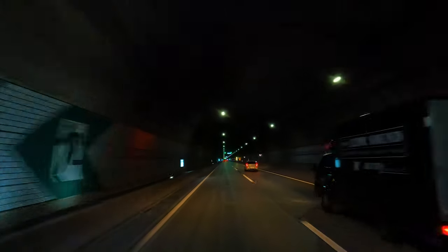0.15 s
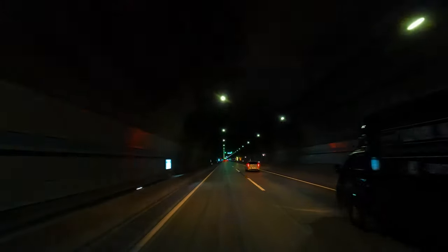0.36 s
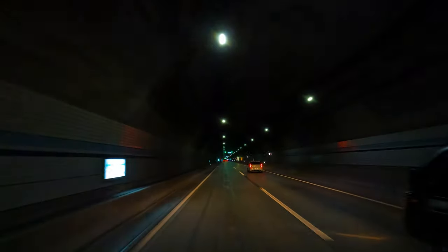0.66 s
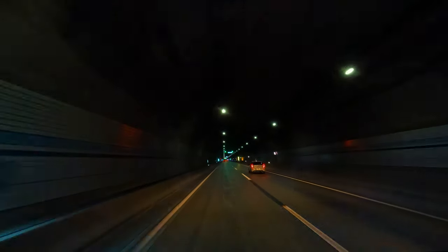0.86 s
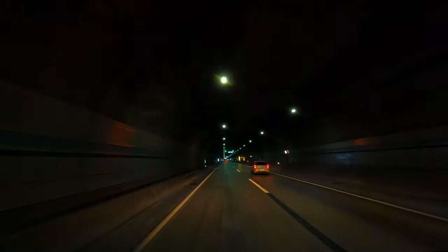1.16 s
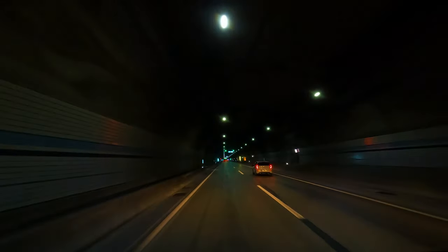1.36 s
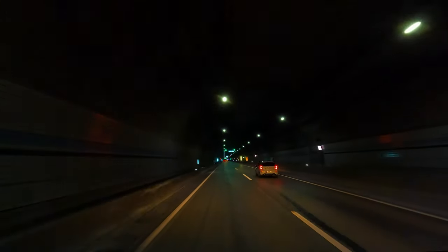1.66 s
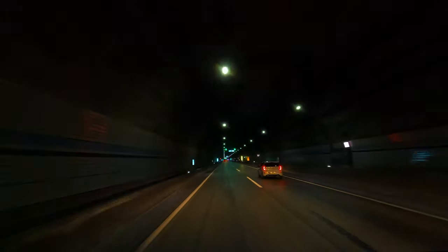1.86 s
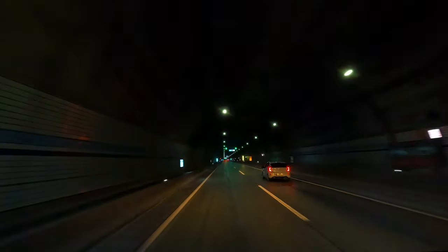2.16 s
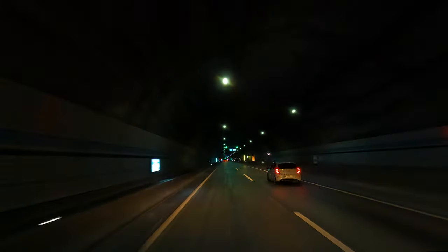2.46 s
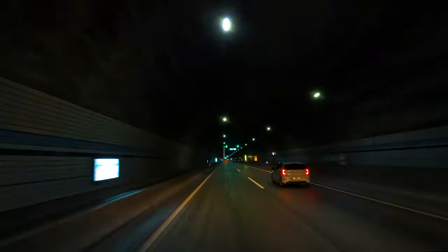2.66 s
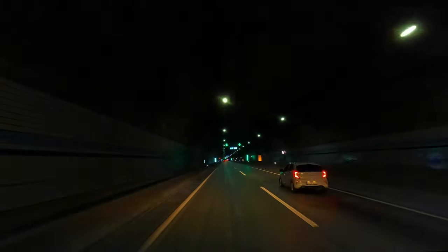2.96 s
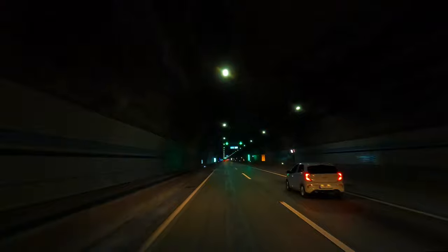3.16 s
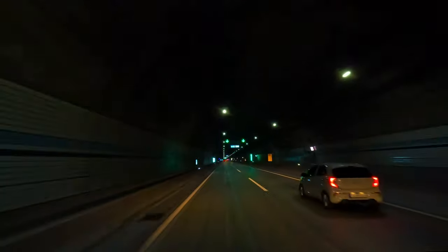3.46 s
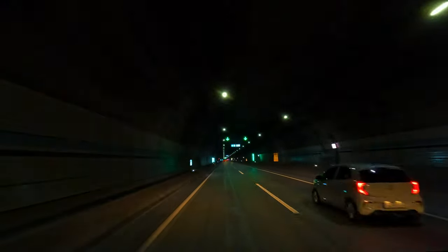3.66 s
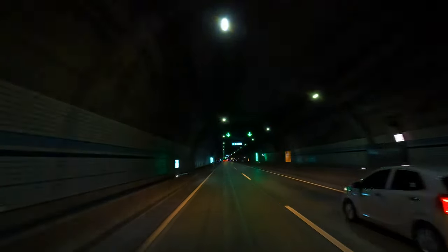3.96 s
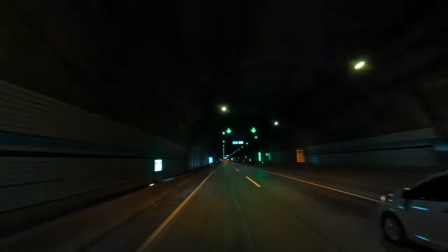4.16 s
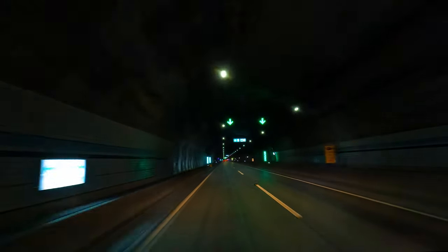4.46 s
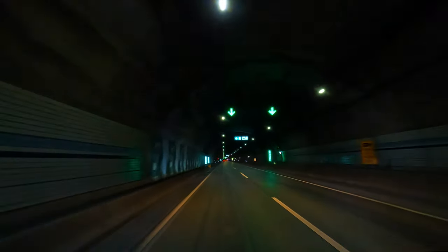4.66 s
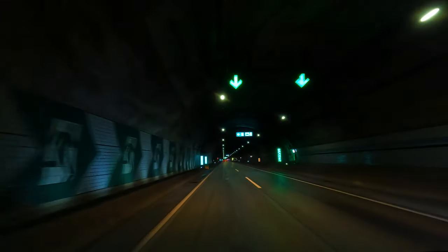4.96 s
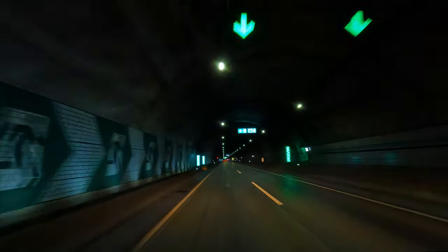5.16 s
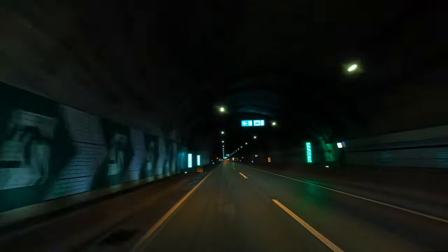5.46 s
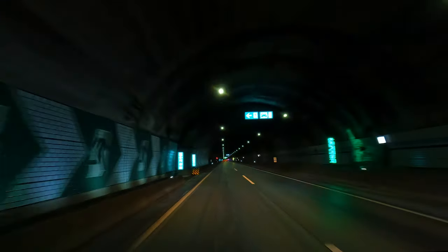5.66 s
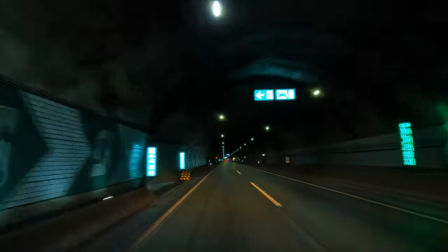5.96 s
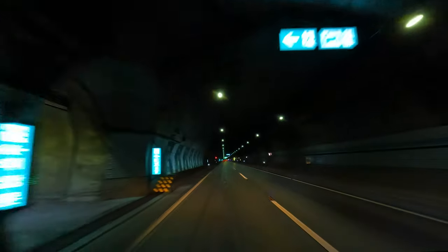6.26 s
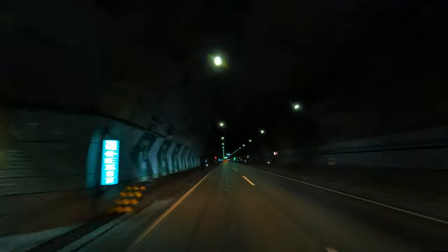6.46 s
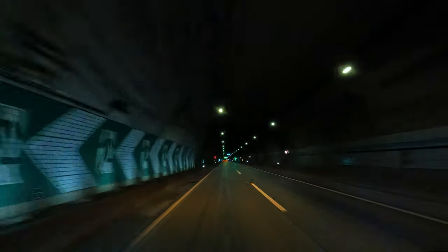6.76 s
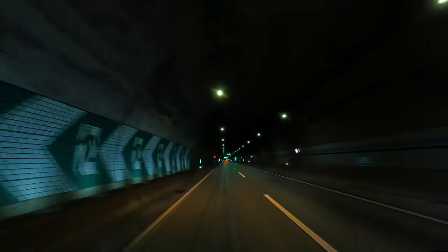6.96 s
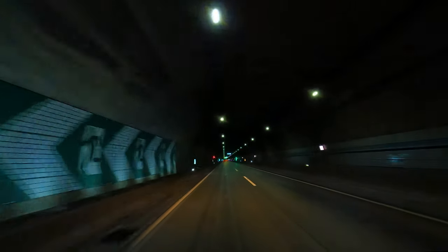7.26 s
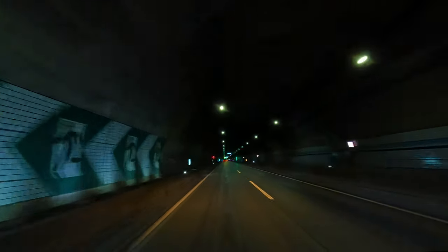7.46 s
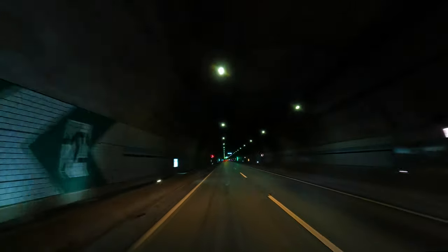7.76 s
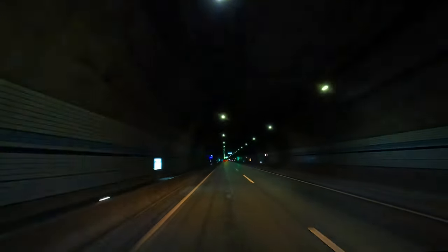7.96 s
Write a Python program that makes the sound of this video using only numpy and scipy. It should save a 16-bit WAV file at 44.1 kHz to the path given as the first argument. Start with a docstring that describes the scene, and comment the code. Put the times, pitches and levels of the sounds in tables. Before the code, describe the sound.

Constant low road rumble fills the closed cabin of a car moving at speed through a tunnel. Tyre roar and light wind hiss gently swell and ebb over it, dulled by the windows and coloured by the tunnel walls. Brief low throbs, a few hollow surges and a faint wavering whine pass through the noise, with two barely audible ticks. The microphone is inside the car.

```python
"""Road rumble fills a car cruising through a long tunnel, heard from behind the windscreen.
The uneven surface forces body, cabin air, tyres and floor to vibrate. Treads roar and air hisses along
the glass; cabin and tunnel walls reflect both, and narrow resonances colour them. Low throbs and hollow
swells pass, air in the tread grooves rings as a thin whine, and two faint, dull ticks sound."""
import sys
import numpy as np
from scipy import signal
from scipy.fft import rfft, irfft
from scipy.io import wavfile
from scipy.ndimage import uniform_filter1d

SR = 44100
rng = np.random.default_rng(int(sys.argv[2]) if len(sys.argv) > 2 else 0)


def put_to_file(sound):
    """Save the sound as 16-bit audio at rate SR, in the file named by the first command-line argument."""
    columns = np.atleast_2d(sound).T  # one column per channel
    safe = np.clip(columns, -1, 1)
    whole_steps = np.round(safe * 32767)
    wavfile.write(sys.argv[1], SR, whole_steps.astype(np.int16))


N = 358091
TIME = np.arange(N) / SR
BINS = np.maximum(np.arange(N // 2 + 1) * SR / N, 1)  # Hz

# spectrum of the road noise in the closed car: (frequency [Hz], relative level [dB])
RUMBLE_SPECTRUM = [(5, -9), (15, -1), (27, 2), (57, -0.4), (71, 1.5), (83, -2), (105, -0.5), (138, -1),
                   (155, -5), (215, -5.5), (250, -8), (300, -6.5), (345, -8.5), (385, -10), (600, -13.5)]
# brief surges and dips in the rumble:
# (centre time [s], duration [s], boom lift [dB], drone lift [dB], growl lift [dB])
SURGES = [(0.077, 0.24, -4, -2.5, 0.5), (0.204, 0.11, -4, 5, 2.5), (.55, 0.6, -0.5, -1.5, -0.5),
          (1.172, 0.24, -1.5, 0.7, -0.6), (1.456, 0.18, -4.5, -3, 1), (1.852, 0.13, 2.5, 0.5, 0),
          (2.4, .35, -1.5, 0, 0.5), (2.697, 0.23, 0.5, 0.3, -0.5), (3.38, 0.7, -0.1, 1.3, 2),
          (4.426, 0.12, -1.5, 4, -1), (4.7, 0.25, 0, -1, -1.5), (5.002, 0.17, 0, 3.5, 0),
          (5.347, 0.19, 0.5, 3.5, -2), (6.402, 0.31, -2, -1.5, 0.5), (6.656, 0.13, -1, 4.5, 1.5),
          (7.066, 0.11, -1.5, 0, 3), (7.352, 0.19, 0, -3, -1), (7.852, 0.26, -3.5, 2.4, -0.8)]
# swell and ebb of the outside rush: (time [s], relative roar level [dB], relative hiss level [dB])
RUSH_LEVELS = [(0.0, -44, -49), (0.27, -45.5, -50.5), (0.46, -41, -48), (0.58, -42.5, -48),
               (0.73, -44.5, -49.5), (0.95, -43.5, -48), (1.15, -42, -48.5), (1.3, -44, -48.5),
               (1.55, -41.5, -48.5), (1.95, -41, -48.5), (2.25, -42, -49), (2.55, -44.5, -49.5),
               (2.9, -41, -48), (3.1, -41.7, -48.5), (3.55, -41.5, -50), (3.8, -42.3, -49.5),
               (4.15, -43, -50.5), (4.4, -41.5, -49.5), (4.76, -40.5, -48), (4.95, -41.5, -48.5),
               (5.3, -42.5, -49.5), (5.55, -43.5, -50.5), (5.8, -40.5, -49.5), (6.05, -42.5, -50),
               (6.3, -40.5, -48.5), (6.75, -40.5, -49), (7.08, -43.5, -50.9), (7.42, -40.3, -48.5),
               (7.7, -43.5, -50.2), (8.1, -40.5, -48.5)]
# transmission through glass and seals: (frequency [Hz], relative gain [dB])
TRANSMISSION = [(620, 0.5), (850, -0.9), (1130, -3.5), (1400, -9.5), (1800, -16.5), (2300, -20),
                (3000, -22.5), (4000, -29), (5500, -36), (8000, -44.5), (10000, -55.5), (11500, -59.5),
                (12700, -65)]
# narrow modes of panes, trim and cabin air: (frequency [Hz], bandwidth [Hz], lift [dB])
MODES = [(640, 14, 2), (820, 26, 2.5), (878, 22, 2.2), (1022, 10, 2), (1090, 9, 3), (1106, 9, 2),
         (1150, 16, 2), (1230, 9, 4), (1535, 12, 3.5), (1598, 14, 3.5), (1635, 20, 6), (1832, 16, 6),
         (1860, 14, 4.5), (1916, 10, 3.5), (1986, 13, 7.5), (2131, 13, 6), (2205, 16, 4.5), (2346, 14, 4.5),
         (2672, 14, 3.5), (2713, 22, 4), (2901, 16, 4), (3165, 10, 4), (3196, 19, 6), (3493, 17, 3),
         (3578, 14, 8), (3816, 20, 5), (3967, 14, 9), (5345, 16, 5), (5916, 16, 5.5), (5986, 20, 5.5),
         (6395, 31, 4)]
# passing throbs and hollow roars:
# (centre time [s], duration [s], frequency [Hz], bandwidth [Hz], level at the centre [dB])
SWELLS = [(0.158, 0.23, 123, 50, -35.5), (0.8, 1, 112, 65, -38), (1.133, 0.3, 300, 109, -42),
          (1.9, 1, 804, 250, -48), (2.697, 0.93, 288, 80, -43.5), (3.08, 0.23, 104, 35, -39),
          (3.2, 0.19, 528, 55.3, -47), (4.898, 0.24, 77, 22, -38.5), (5.72, 0.31, 74.5, 30, -40.5),
          (6.48, 0.64, 795, 200, -48), (7.143, 0.36, 120, 55.7, -38), (7.618, 0.21, 118, 55, -38),
          (8.022, 0.062, 76, 22, -40)]
# strength of the groove whine: (time [s], level [dB])
WHINE_LEVELS = [(0, -53.5), (0.6, -55.5), (0.75, -57.5), (1.3, -59), (1.9, -58), (2.5, -59), (3.0, -52.5),
                (3.65, -55.5), (3.9, -69), (4.55, -61), (4.75, -53), (5.35, -53), (5.55, -58), (5.8, -55.5),
                (6.7, -53.5), (7.3, -50.5), (8.1, -59.5)]
# faint, dull ticks in the road noise: (time [s], gain [dB], centre frequency [Hz], decay time [s])
TICKS = [(3.794, -28.5, 523, 0.0074), (7.322, -30.5, 1020, 0.0045)]
# stereo width at the seat: (frequency [Hz], side relative to mid [dB])
STEREO_WIDTH = [(120, -82.5), (170, -67), (240, -61), (320, -50.5), (420, -20.5), (600, -18.5), (940, -16),
                (2400, -14.5), (5000, -15), (8000, -19.5)]

SHAKE_DB, BOOM_DB, DRONE_DB, GROWL_DB = -38.5, -34.5, -38, -40  # rms before surges, grain and lumps
LUMP_SPREAD_DB, LUMP_RATE_HZ = 0.86, 13
WHINE_HZ, WHINE_WIDTH_HZ = 1061, 11
TOP_HZ = 12700


def road_rumble():
    """Forced vibration: the road shakes the sprung body, pumps the cabin air, drums tyres and floor."""
    boom_lift_db, drone_lift_db, growl_lift_db = surge_lift()
    body = vibration(band(5, 60), hold_s=0.036, grain_db=1.0, rate_hz=4)
    cabin_air = vibration(band(58.7, 146.6), hold_s=0.046, grain_db=0.56, rate_hz=5.2)
    tyre_cavity = vibration(band(157.3, 262.0), hold_s=0.19, grain_db=0.66, rate_hz=4.5)
    floor = vibration(band(274.0, 620), hold_s=0.32, grain_db=0.33, rate_hz=6.3)
    shake = undb(SHAKE_DB) * body
    boom = undb(BOOM_DB + boom_lift_db) * cabin_air
    drone = undb(DRONE_DB + drone_lift_db) * tyre_cavity
    growl = undb(GROWL_DB + growl_lift_db) * floor
    lumps = undb(LUMP_SPREAD_DB * flutter(LUMP_RATE_HZ))  # tyres and floor waver together
    return shake + boom + lumps * (drone + growl)


def vibration(passband, hold_s, grain_db, rate_hz):
    """Random excitation: a part of the car rumbles, its strength wandering with the grain of the road."""
    grain = undb(grain_db * flutter(rate_hz))
    return grain * steady_noise(colour(RUMBLE_SPECTRUM) * passband, hold_s)


def surge_lift():
    """Amplitude modulation: brief, smooth surges and dips of boom, drone and growl, in dB."""
    lift = np.zeros((3, N))
    for centre_s, length_s, *lift_db in SURGES:
        lift += np.outer(lift_db, np.exp(-(2 * (TIME - centre_s) / length_s) ** 2))
    return lift


def outside_rush():
    """Rolling and flow noise: treads roar and air hisses, swelling with passing walls and traffic."""
    roar_db, hiss_db = curves(RUSH_LEVELS)
    treads = steady_noise(path_to_seat(cabin_db=-14.5, tunnel_db=-7.5) * band(622, 1260), hold_s=0.27)
    air = steady_noise(path_to_seat(cabin_db=-14.5, tunnel_db=-2.0) * band(1338, 14000), hold_s=0.38)
    turbulence = flutter(rate_hz=16)
    roar = undb(roar_db - 1.36 + 0.59 * turbulence) * treads
    hiss = undb(hiss_db + 0.5 * turbulence) * air
    # stronger airflow is also brighter: the treble swells more than the rest
    swell_db = uniform_filter1d(hiss_db - hiss_db.mean(), size=SR // 4)
    treble = shape(hiss, band(2500, 16000, order=4))
    return roar + hiss + (undb(0.68 * swell_db) - 1) * treble


def path_to_seat(cabin_db, tunnel_db):
    """Superposition: direct sound and echoes add, filtered by glass, seals and narrow resonances."""
    cabin = undb(cabin_db) * reflections(delay_s=0.0034, build_s=0.0041, t60_s=0.43)
    tunnel = undb(tunnel_db) * reflections(delay_s=0.065, build_s=0.019, t60_s=0.41)
    ringing = 1 + sum((undb(db) - 1) / (1 + (2 * (BINS - hz) / width) ** 2) for hz, width, db in MODES)
    return colour(TRANSMISSION) * (1 + cabin + tunnel) * ringing


def reflections(delay_s, build_s, t60_s):
    """Reverberation: the frequency response of a unit-energy cloud of echoes that builds and decays."""
    age = np.maximum(TIME - delay_s, 0)
    onset = 1 - np.exp(-age / build_s)
    decay = np.exp(-np.log(1000) * age / t60_s)
    cloud = rng.standard_normal(N) * onset * decay
    return rfft(cloud / np.sqrt(np.sum(cloud ** 2)))


def resonant_swells():
    """Resonance, stirred for a while: low bands throb in the cabin, higher ones sound hollow."""
    out = np.zeros(N)
    for centre_s, length_s, hz, width_hz, db in SWELLS:
        envelope = np.exp(-2 * ((TIME - centre_s) / length_s) ** 2)
        out += undb(db) * envelope * ringing_noise(hz, width_hz, hold_s=0.21)
    return out


def groove_whine():
    """Air resonance in the tread grooves: a thin, unsteady tone that slowly comes and goes."""
    level_db, = curves(WHINE_LEVELS)
    return undb(level_db) * ringing_noise(WHINE_HZ, WHINE_WIDTH_HZ, hold_s=0.13)


def dull_ticks():
    """Exponential decay: two faint, dull ticks in the road noise, each a quickly fading noise burst."""
    out = np.zeros(N)
    for start_s, db, hz, decay_s in TICKS:
        age = np.maximum(TIME - start_s, 0)
        envelope = (1 - np.exp(-age / 0.001)) * np.exp(-age / decay_s)
        out += undb(db) * envelope * ringing_noise(hz, width_hz=0.26 * hz, hold_s=0.0084)
    return out


def ringing_noise(hz, width_hz, hold_s):
    """Narrow-band noise: the response of a randomly driven resonance."""
    return steady_noise(1 / (1 + (2 * (BINS - hz) / width_hz) ** 4), hold_s)


def steady_noise(gain, hold_s):
    """Coloured noise whose rms, taken over hold_s, stays near 1."""
    noise = shape(rng.standard_normal(N), gain)
    size = max(int(hold_s * SR), 1)
    power = uniform_filter1d(uniform_filter1d(noise ** 2, size), size)
    return noise / np.sqrt(power)


def flutter(rate_hz):
    """Random modulation: low-passed noise with a standard deviation of 1."""
    wander = shape(rng.standard_normal(N), 1 / (1 + (BINS / rate_hz) ** 4))
    return wander / wander.std()


def shape(sound, gain):
    """Linear filtering: the spectrum is multiplied by a gain at each frequency."""
    return irfft(rfft(sound) * gain, N)


def band(low_hz, high_hz, order=16):
    """Gain of a Butterworth band-pass."""
    return ((1 + (low_hz / BINS) ** order) * (1 + (BINS / high_hz) ** order)) ** -0.5


def colour(points):
    """Gain interpolated on a logarithmic frequency axis from (frequency [Hz], level [dB]) points."""
    hz, db = np.transpose(points)
    return undb(np.interp(np.log(BINS), np.log(hz), db))


def curves(table):
    """Each level column of a table, interpolated linearly in time."""
    times, *columns = np.transpose(table)
    return [np.interp(TIME, times, column) for column in columns]


def undb(db):
    """Decibels to amplitude ratio."""
    return 10 ** (np.asarray(db) / 20)


def scene():
    """Decorrelation: the bass is the same on both sides, while the diffuse treble differs a little."""
    mid = road_rumble() + outside_rush() + resonant_swells() + groove_whine() + dull_ticks()
    diffuse_phase = np.angle(reflections(delay_s=0.001, build_s=0.002, t60_s=0.3))
    side = shape(mid, colour(STEREO_WIDTH) * np.exp(1j * diffuse_phase))
    return np.array([mid + side, mid - side])


def record(dry):
    """Band limiting: a steep elliptic low-pass removes the treble above TOP_HZ."""
    return signal.sosfilt(signal.ellip(8, 0.1, 70, TOP_HZ, fs=SR, output="sos"), dry)


dry = scene()
out = record(dry)
put_to_file(out)
```